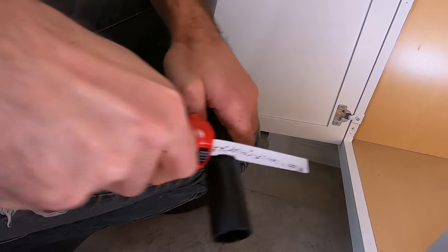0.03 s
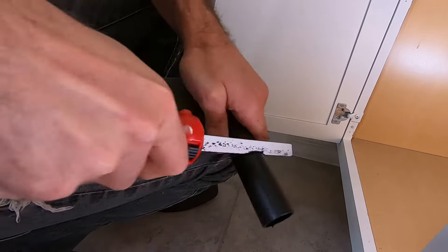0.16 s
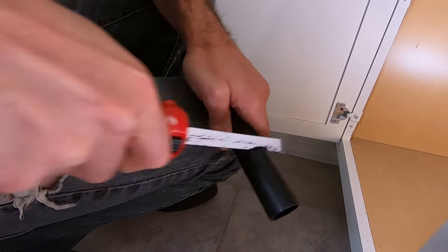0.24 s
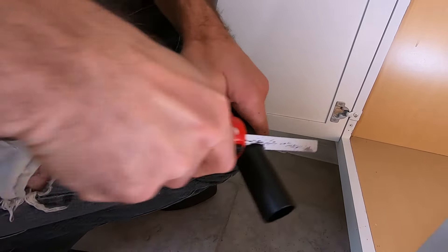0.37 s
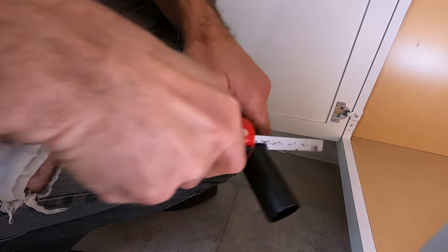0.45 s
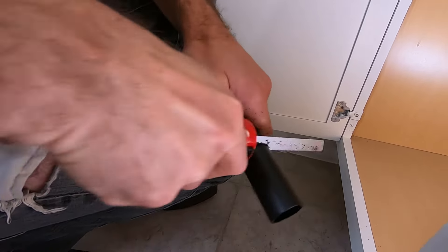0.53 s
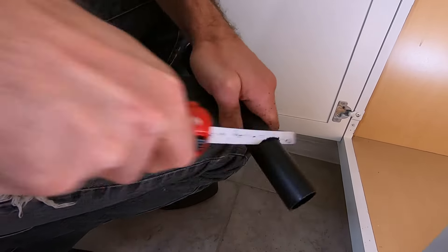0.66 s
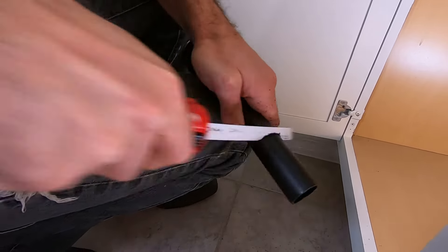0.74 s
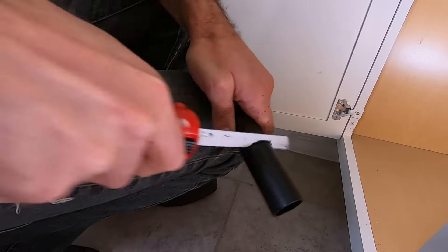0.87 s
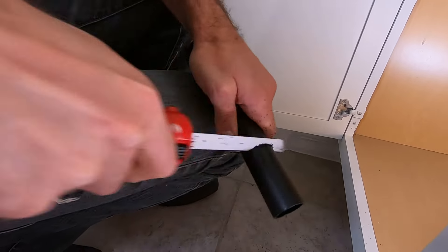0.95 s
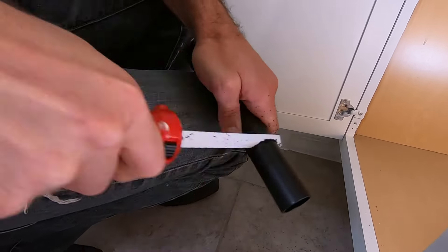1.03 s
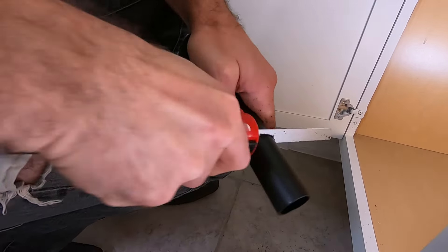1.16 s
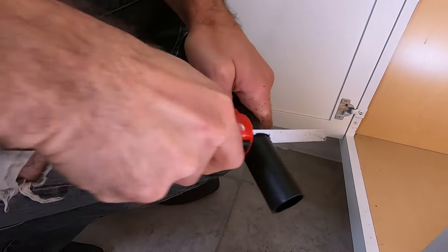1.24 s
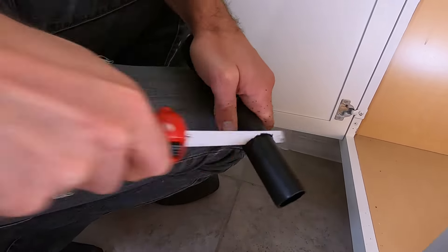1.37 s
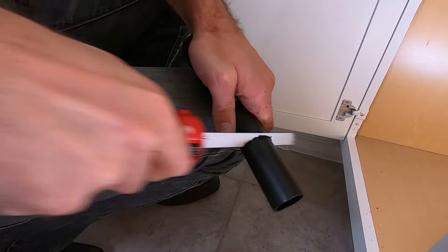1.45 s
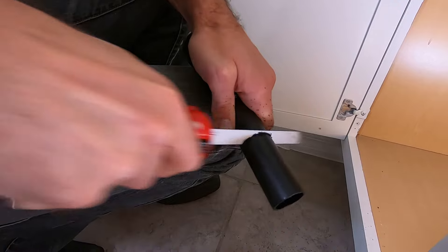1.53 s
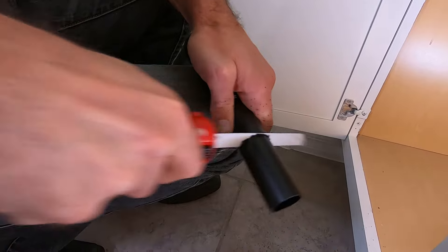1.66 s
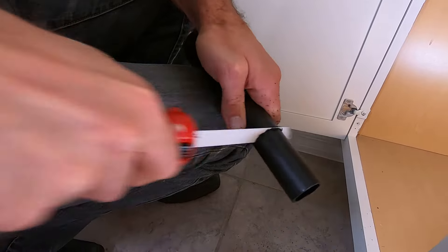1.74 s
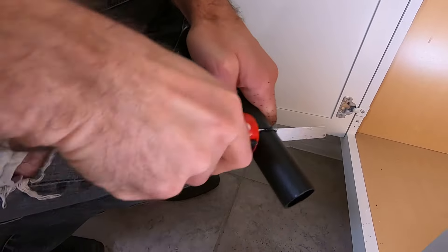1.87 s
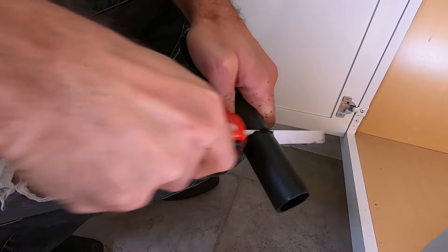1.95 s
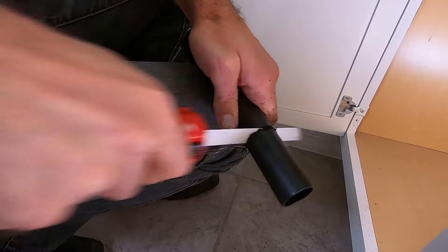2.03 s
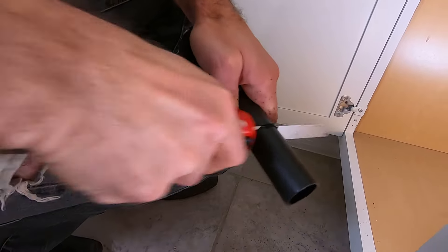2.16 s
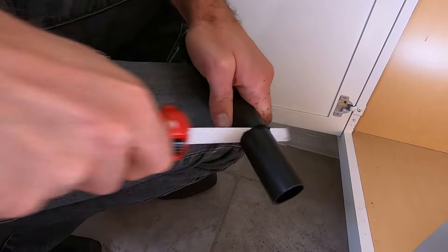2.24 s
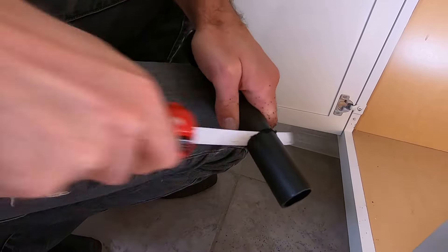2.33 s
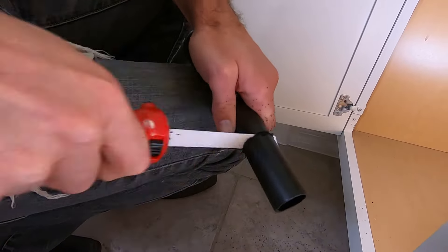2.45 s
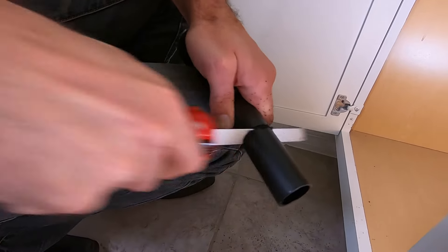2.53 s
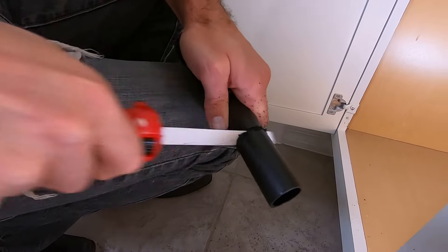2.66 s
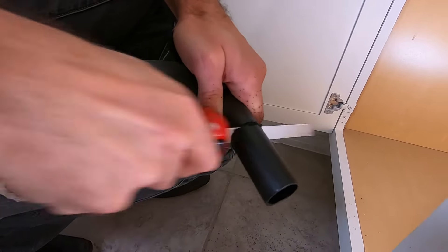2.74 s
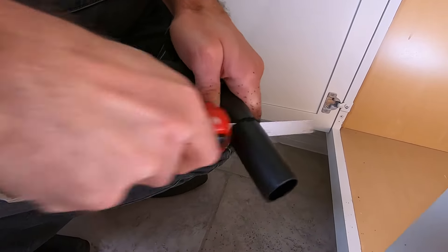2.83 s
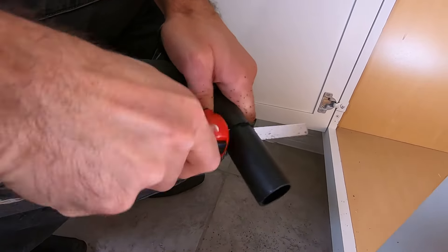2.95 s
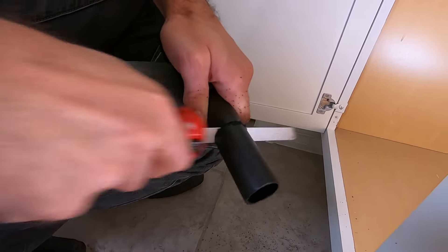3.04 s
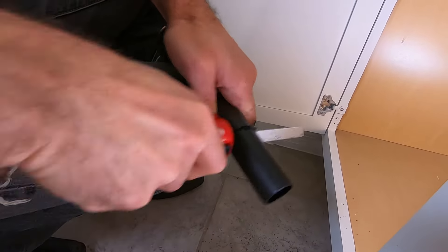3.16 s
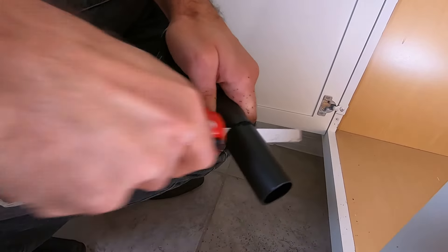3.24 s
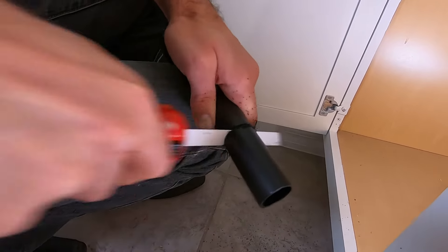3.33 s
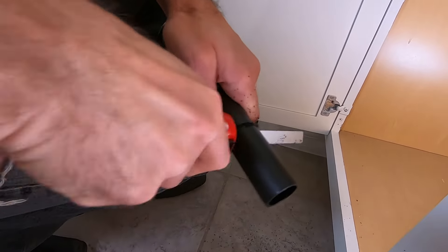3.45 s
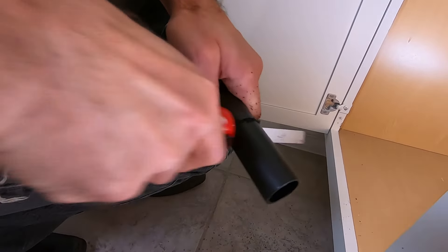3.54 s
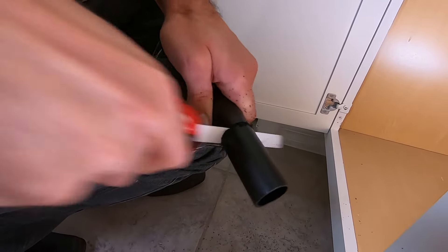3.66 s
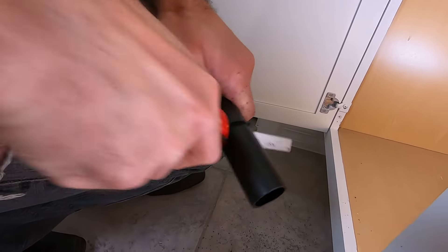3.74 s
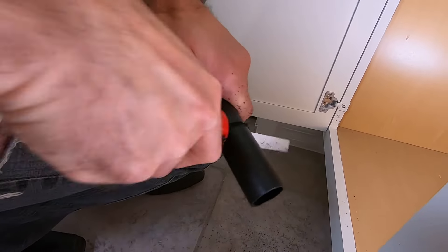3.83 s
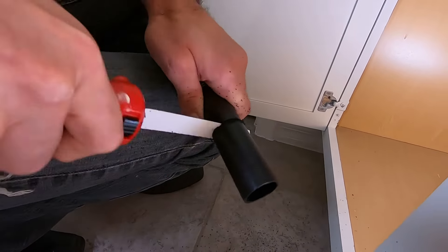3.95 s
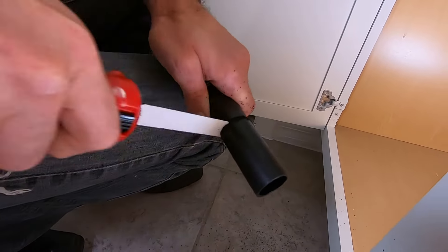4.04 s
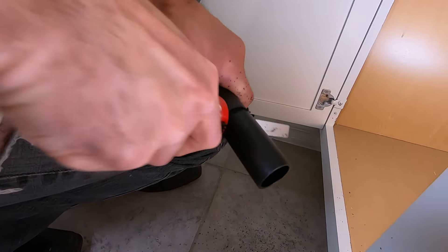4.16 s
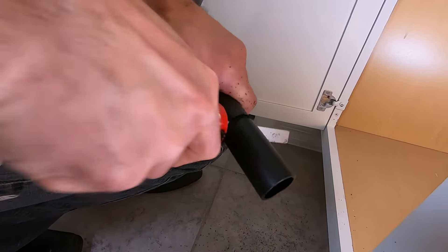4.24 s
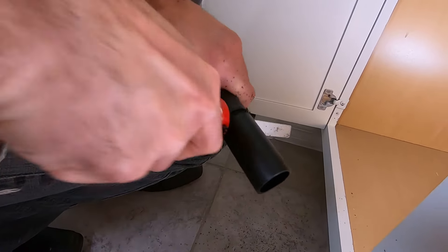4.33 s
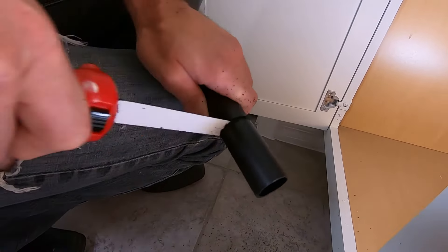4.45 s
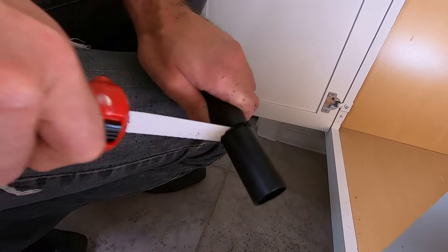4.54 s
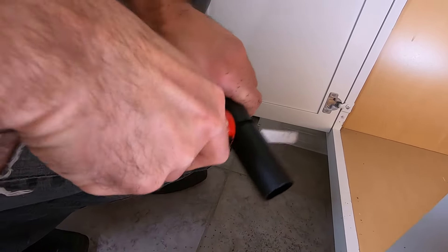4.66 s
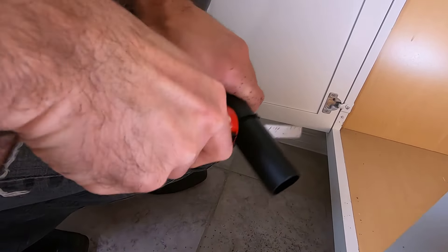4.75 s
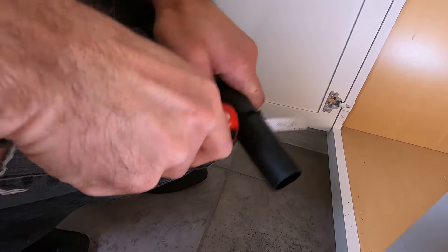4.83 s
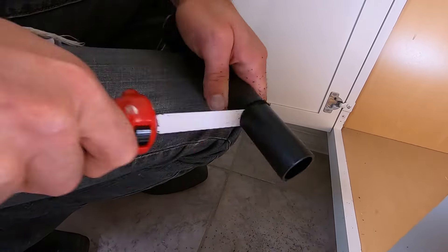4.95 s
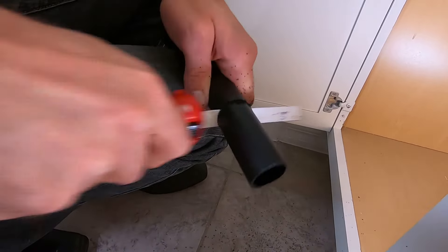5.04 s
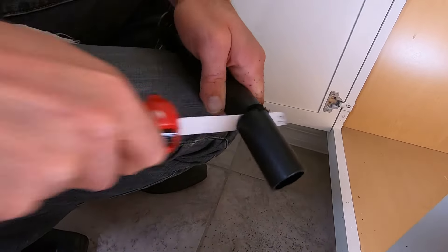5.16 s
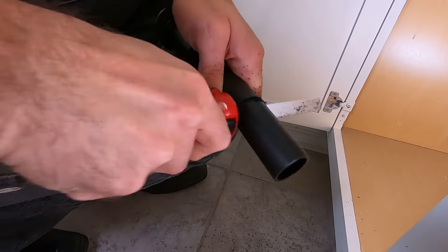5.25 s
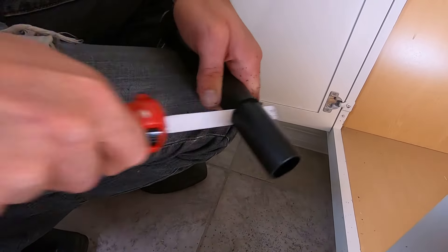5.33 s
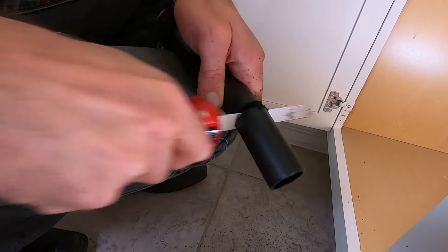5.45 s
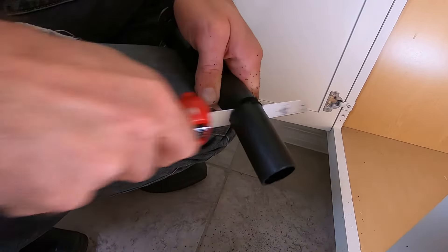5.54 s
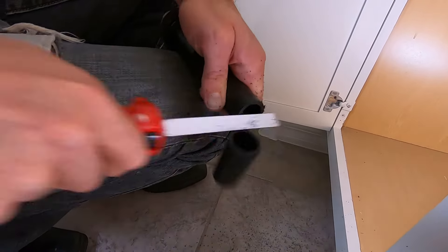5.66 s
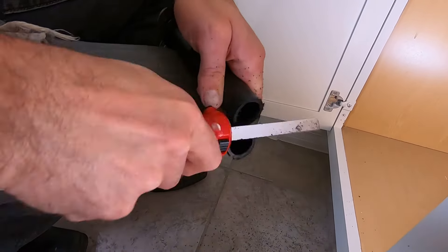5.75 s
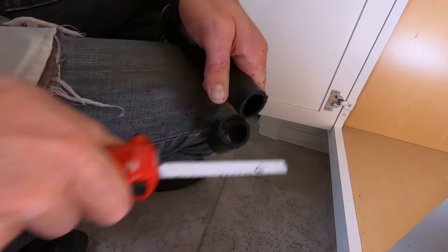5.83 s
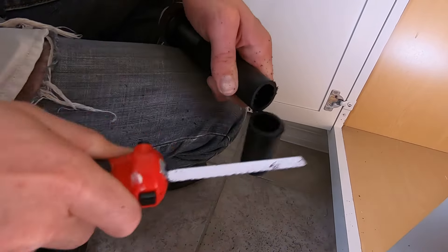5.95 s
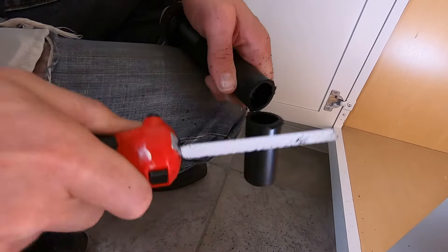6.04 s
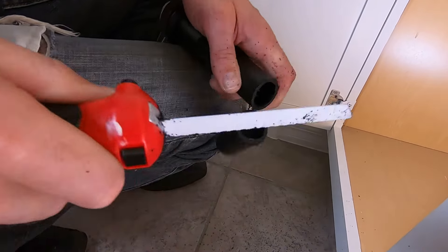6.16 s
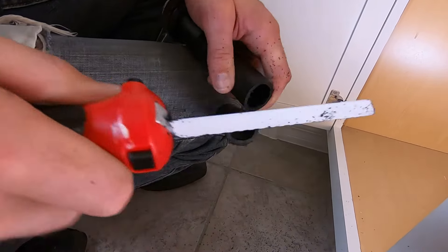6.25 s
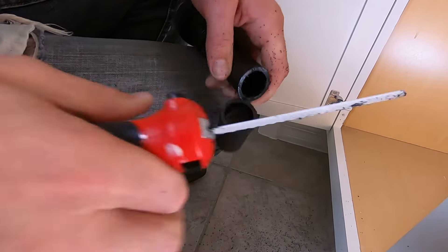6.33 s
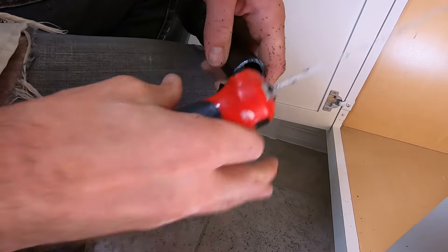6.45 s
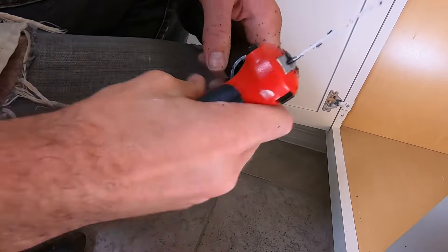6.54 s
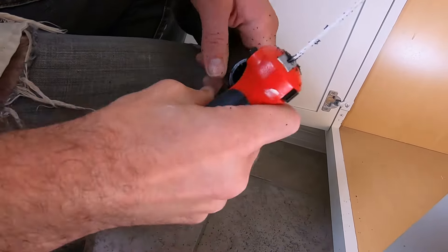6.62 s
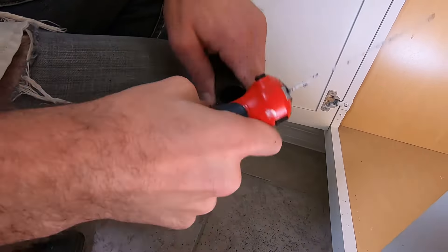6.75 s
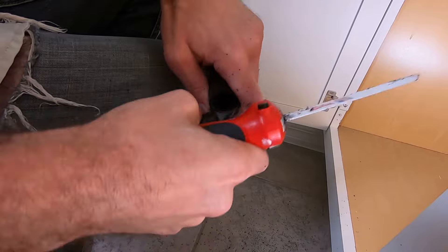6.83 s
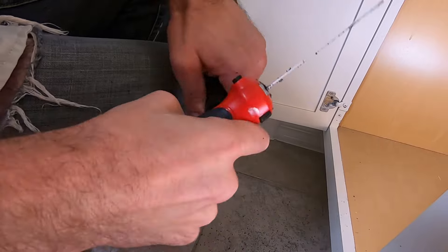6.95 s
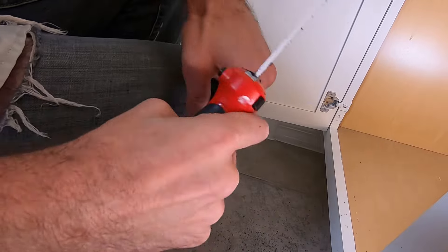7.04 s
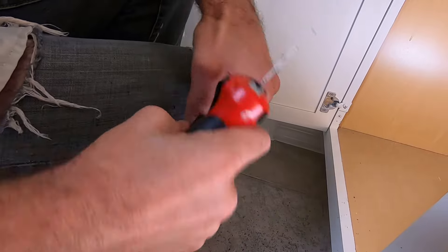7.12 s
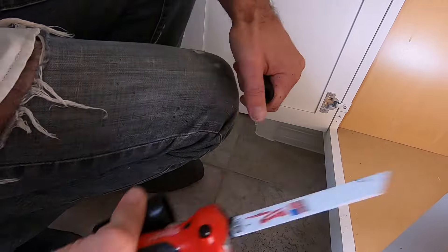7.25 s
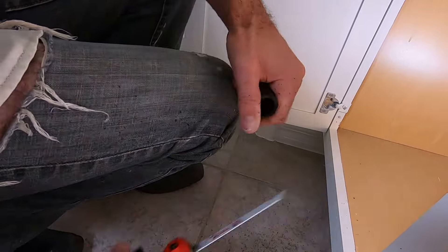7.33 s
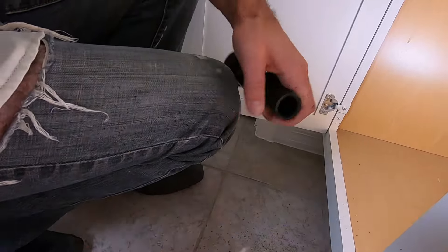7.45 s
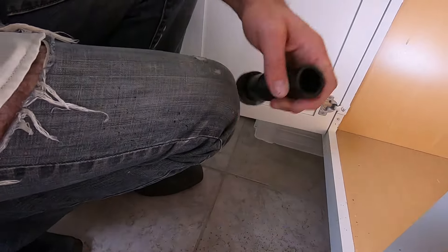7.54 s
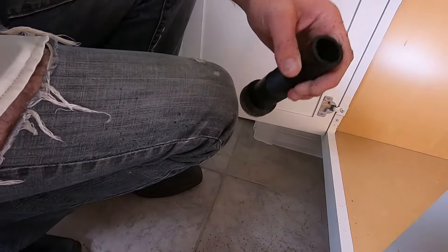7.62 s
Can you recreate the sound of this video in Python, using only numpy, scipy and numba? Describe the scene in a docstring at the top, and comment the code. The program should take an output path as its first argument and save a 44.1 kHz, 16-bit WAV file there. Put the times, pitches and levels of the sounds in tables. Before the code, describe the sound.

A small hand saw rasps through a hollow plastic pipe in very fast strokes, slows, then the offcut snaps off and a light scrape follows.

```python
"""Hand saw through a plastic pipe

A small hand saw goes through a plastic drain pipe in quick short strokes, close by, in a small hard room.
Tooth contacts, timed by the blade speed, rasp directly and drive resonances of the pipe and blade.
Pushes ring the pipe, mostly higher as the cut deepens; pulls skim and hiss. Slow last strokes break through.
Cracks and decaying hollow modes snap off the offcut; filtered noise gives snags, squeals, rubs, taps and bumps.
A short scrape on the cut edge comes last, over the faint noise of still air."""
import sys
import numpy as np
from scipy import signal
from scipy.fft import rfft, irfft, next_fast_len
from scipy.io import wavfile
from scipy.ndimage import uniform_filter1d
from numba import njit

SR = 44100
rng = np.random.default_rng(int(sys.argv[2]) if len(sys.argv) > 2 else 0)


def waveform_to_disk(signal):
    """Save audio, clipped to [-1, 1], as 16-bit WAV at the path in sys.argv[1]."""
    frames = np.transpose(np.atleast_2d(signal))
    scaled = np.clip(frames, -1, 1) * 32767
    samples = np.round(scaled).astype(np.int16)
    wavfile.write(sys.argv[1], SR, samples)


N = 339129
TIME = np.arange(N) / SR
FFT_SIZE = next_fast_len(N + SR)
FREQS = np.maximum(np.fft.rfftfreq(FFT_SIZE, 1 / SR), 1)
# the run of quick strokes lasts between these times (s)
RUN_START_S, RUN_END_S = 0.14, 5.08
# resonances of the pipe wall and blade: (frequency [Hz], width [Hz], lift [dB])
WALL_RESONANCES = [(271, 28, 6), (674, 55, 11), (1176, 68, 3.5), (1307, 43, 2.5), (2450, 41, 3.5),
                   (3670, 2000, 7), (8330, 550, 3.5)]


def from_db(db):
    """Decibels to gain."""
    return 10 ** (np.asarray(db) / 20)


def rms_one(x):
    """Scale to unit rms."""
    return x / np.sqrt(np.mean(x ** 2) + 1e-20)


def evened(x, span_s):
    """Hold the rms near one over every short span."""
    power = uniform_filter1d(x ** 2, max(int(span_s * SR), 8))
    return x / np.sqrt(np.abs(power) + 1e-9)


def in_time(rows):
    """Columns of a curve at every sample."""
    s, *columns = np.transpose(rows)
    return [np.interp(TIME, s, column) for column in columns]


def at_hz(points):
    """A colour table read on a log-frequency axis."""
    hz, value = np.transpose(points)
    return np.interp(np.log(FREQS), np.log(hz), value)


def lift(resonances):
    """Resonances as a dB curve."""
    return sum(db / (1 + (2 * (FREQS - hz) / width_hz) ** 2) for hz, width_hz, db in resonances)


def coloured(x, db):
    """Filter by a dB curve; unit rms."""
    return rms_one(irfft(rfft(x, FFT_SIZE) * from_db(db), FFT_SIZE)[:N])


def noise(spectrum):
    """Noise of a given colour; unit rms."""
    return coloured(rng.standard_normal(N), at_hz(spectrum))


def grains(per_s, spread_db):
    """Random clicks of uneven size; unit rms."""
    sizes = from_db(spread_db * np.minimum(rng.exponential(1, N), 4))
    signs = rng.choice([-1, 1], N)
    return rms_one(sizes * signs * (rng.random(N) < per_s / SR))


def swells(rows):
    """A bell-shaped rise and fall for each row (time [s], level [dB], half length [s])."""
    return sum(from_db(db) * np.exp(-0.5 * np.minimum(((TIME - s) / half) ** 2, 100))
               for s, db, half in rows)


def glides(rows, fall):
    """Level and pitch of short falling tones; log pitch drops by fall in each half length."""
    s, db, hz, half = np.transpose(rows)
    nearest = np.searchsorted((s[1:] + s[:-1]) / 2, TIME)
    lead = np.clip((s[nearest] - TIME) / half[nearest], -2, 2)
    return swells(zip(s, db, half)), hz[nearest] * np.exp(fall * lead)


@njit
def resonate(x, angle, radius):
    """Two-pole resonance whose centre moves."""
    y = np.zeros(len(x))
    for i in range(2, len(x)):
        feedback = 2 * radius * np.cos(angle[i]) * y[i - 1] - radius * radius * y[i - 2]
        y[i] = x[i] - x[i - 2] + feedback
    return y


def ring(x, hz, width_hz):
    """Drive a resonance with steep skirts: a sharp pole pair, then one six times as broad."""
    angle = 2 * np.pi * hz / SR * np.ones(N)
    sharp = resonate(x, angle, np.exp(-np.pi * width_hz / SR))
    return resonate(sharp, angle, np.exp(-np.pi * 6 * width_hz / SR))


def sounding(drive, hz, width_hz):
    """A driven resonance held at a steady level."""
    return evened(ring(drive, hz, width_hz), span_s=0.011)


def saw():
    """Tooth contacts heard directly as a rasp, and through the rings of the pipe."""
    # progress of the cut: (time [s], upper ring [Hz], then levels against the rasp:
    # upper ring [dB], blade hiss [dB], bright chatter [dB])
    cut_progress = [(0.2, 1320, -21.5, -19, -6.5), (1.1, 1780, -17.5, -10, -2), (2.4, 1973, -5, -12, -3),
                    (2.9, 1836, -0.5, -18.5, -15.5), (3.5, 1850, -9, -14.5, -13), (4.9, 1880, -14, -7, -14),
                    (5.19, 1666, -0.5, -8, -15), (5.3, 1680, -2, 2, -18.5), (5.43, 1800, -3, -5, -15.5),
                    (5.55, 1670, -18.5, -1, -20)]
    # main ring of the pipe as the cut opens: (time [s], frequency [Hz])
    main_ring = [(0.9, 635), (1.3, 720), (1.7, 818), (3.4, 870), (5.0, 870), (5.19, 799), (5.3, 872),
                 (5.7, 940)]
    # teeth tearing the plastic: (frequency [Hz], relative level [dB])
    rasp_colour = [(40, -25), (100, -10), (230, -6), (400, -9), (1300, 1), (2100, -0.5), (3000, -7),
                   (5900, -11.5), (7600, -12.5), (8700, -6.5), (12500, -19.5), (15700, -36.5)]
    # steel sliding in the kerf: (frequency [Hz], relative level [dB])
    hiss_colour = [(1500, -30), (3800, -2.5), (9000, 2), (15800, -9)]
    skate_db, skate_end_s = 10.5, 2.0  # in the shallow kerf the pull skates: hiss lift at time 0, and its end
    ring_bend, choke_db = 0.16, 12.5  # ring flat by this share at rest; choked by the end of a stroke
    growl_fall = 1.75  # log of the pitch ratio over the braking

    strokes = all_strokes()
    stroke, speed, spent = blade_motion(strokes)
    _, _, rasp_db, ring_db, growl_db, pull = strokes[stroke].T
    upper_hz, upper_db, hiss_db, chatter_db = in_time(cut_progress)
    # the blade leans differently on every stroke, which shifts colour and pitch a little
    lean = rng.standard_normal((len(strokes), 4))[stroke].T

    knocks, chips = teeth(speed)
    rasp = coloured(chips + 0.21 * knocks, at_hz(rasp_colour) + lift(WALL_RESONANCES))
    upper = rms_one(ring(teeth(speed)[1], upper_hz * np.exp(0.042 * lean[3]), width_hz=80))
    hiss = coloured(teeth(speed)[1], at_hz(hiss_colour) + lift(WALL_RESONANCES))
    # a stroke that skims hisses and hardly rings the pipe; one that digs in is darker
    skim_db = 0.3 * (rasp_db - ring_db)
    skim_db = skim_db + pull * skate_db * np.maximum(1 - TIME / skate_end_s, 0)
    upper_db = upper_db + 0.12 * (ring_db - rasp_db) + pull * 2.5
    tearing = rasp + from_db(upper_db + 1.4 * lean[0]) * upper
    tearing = tearing + from_db(hiss_db + skim_db + 2 * lean[1]) * hiss

    contacts = teeth(speed)[1]
    bright = chatter(stroke, spent, contacts, low_hz=1400, high_hz=4400, width_hz=830)
    dull = chatter(stroke, spent, contacts, low_hz=560, high_hz=1350, width_hz=87)
    tearing = tearing + from_db(chatter_db) * bright + from_db(-7.5) * dull
    # the blade still drags in the kerf as it turns, so neighbouring strokes run into each other
    drag = from_db(-19) * uniform_filter1d(speed, int(0.032 * SR))
    tearing = evened(tearing, span_s=0.014) * from_db(rasp_db - 0.23) * (speed ** 1.43 + drag)

    pitch = in_time(main_ring)[0] * np.exp(0.036 * lean[2])
    body = sounding(chips + knocks, pitch * (1 - ring_bend * (1 - speed)), width_hz=32.4)
    body = body * from_db(ring_db + 1.5 - choke_db * spent)
    # the pull wakes a lower ring, set against its rasp
    pull_ring = sounding(contacts, 652.4 * np.exp(0.03 * lean[0]), width_hz=15)
    body = body + pull_ring * from_db(rasp_db - 9) * pull

    # as the blade brakes, the teeth drag one by one: a rough growl slides down from the ring
    growl = sounding(contacts, pitch * np.exp(-growl_fall * spent), width_hz=320)
    growl = growl * np.sin(np.pi * spent) * from_db(rasp_db + growl_db)
    # the slow last strokes stick and slip: their level wavers
    slipping = from_db(1.5 * noise([(70, -1), (200, -59)]) * (TIME > RUN_END_S))
    return (tearing + body * speed ** 2.17 + growl * speed ** 1.2) * slipping


def all_strokes():
    """The quick run and the single strokes, in order of time; single strokes count as pushes."""
    # strokes that nick the pipe, and slow ones that break through: (time at full blade speed [s],
    # length [s], rasp before trim [dB], pipe ring before trim [dB], growl against the rasp [dB])
    single_strokes = [(0.012, 0.052, -24, -25.5, -5.5), (0.116, 0.034, -33, -46.5, -9.5),
                      (5.091, 0.045, -35.5, -39, -20), (5.182, 0.125, -25.5, -24.5, -10),
                      (5.308, 0.1, -25, -26.5, -18), (5.426, 0.135, -28.5, -30, -22.5),
                      (5.55, 0.085, -22.5, -21.5, -22), (5.666, 0.065, -31.5, -28, 6),
                      (5.71, 0.075, -28.5, -30, -6)]
    rows = np.vstack([quick_strokes(), [(*row, 0) for row in single_strokes]])
    return rows[np.argsort(rows[:, 0])]


def quick_strokes():
    """Pushes and pulls in turn at the arm's pace: rows (s, length s, rasp, ring, growl dB, 1 for a pull)."""
    # pace of the arm: (time [s], push-and-pull cycles per second [Hz])
    arm_pace = [(0.0, 7.465), (0.15, 12.024), (0.45, 12.086), (0.6, 10.39), (1.4, 12.732), (1.6, 12.011),
                (2.2, 14.982), (2.8, 14.887), (3.6, 13.458), (3.8, 12.608), (4.6, 11.68), (5.05, 11.866)]
    # effort, before each stroke's own changes; the pull eases off as the cut deepens:
    # (time [s], push rasp [dB], pull rasp [dB], push pipe ring [dB])
    arm_effort = [(0.16, -18, -27.5, -29), (0.35, -24.5, -23.5, -31), (0.65, -26, -25, -24.5),
                  (1.1, -21, -21, -31), (2.4, -21.5, -22.5, -28.5), (3.1, -21, -26, -25.5),
                  (4.0, -25, -29, -24.5), (4.55, -26.5, -31, -24), (5.05, -24.5, -28, -22.5)]
    # strokes that dig in, each applied to the nearest: (time [s], extra pipe ring [dB], extra rasp [dB])
    digging_in = [(0.206, 10, -5), (0.369, 4.5, 2), (0.496, 17, 4.5), (0.537, 10, 5.5), (0.765, -2, 0.5),
                  (0.813, 4.5, 1.5), (0.946, 12, 1.5), (1.075, 7.5, -0.5), (1.245, 6.5, 0.5),
                  (1.445, 8.5, 1), (1.644, 7.5, -1.5), (2.23, 3.5, 1.5), (2.27, -6, 2.5), (2.36, 2.5, 0),
                  (2.395, 15.5, 1.5), (2.53, 7, 0), (3.145, 8.5, 3.5), (3.178, -2, 2.5), (3.395, 6.5, -1),
                  (3.539, 5, 0.5), (3.615, 3.5, 0), (3.845, 2, -0.5), (4.165, 4, 2.5), (4.25, 2, -1.5),
                  (4.334, 6, 0), (4.417, 5, 1.5), (4.545, 10.5, 2), (4.676, 7.5, 1), (4.842, 2.5, 2.5),
                  (4.928, 6, 0.5)]
    push_s = 0.012  # a push is at full speed here
    push_share = 0.53  # of each cycle

    pace, = in_time(arm_pace)
    cycles = np.cumsum(pace) / SR
    cycles -= np.interp(push_s, TIME, cycles)
    first, last = np.interp([RUN_START_S, RUN_END_S], TIME, 2 * cycles)
    number = np.arange(np.ceil(first), last)
    s = np.interp(number / 2, cycles, TIME)
    push = number % 2 == 0
    length = np.where(push, push_share, 1 - push_share) / np.interp(s, TIME, pace)

    push_db, pull_db, ring_db = (np.interp(s, TIME, column) for column in in_time(arm_effort))
    extra_ring_db, extra_rasp_db = np.zeros((2, len(s)))
    for at, more_ring_db, more_rasp_db in digging_in:
        nearest = np.argmin(np.abs(s - at))
        extra_ring_db[nearest] += more_ring_db
        extra_rasp_db[nearest] += more_rasp_db
    # no two strokes are alike: each level has its own random spread in dB
    chance = rng.standard_normal((3, len(s)))
    rasp_db = np.where(push, push_db, pull_db) + extra_rasp_db + 0.8 * chance[0]
    ring_db = ring_db - 16 * ~push + extra_ring_db + 1.2 * chance[1]  # a pull rings the pipe 16 dB less
    growl_db = np.where(push, -6, -17) + 2.5 * chance[2]
    return np.column_stack([s, length, rasp_db, ring_db, growl_db, ~push])


def blade_motion(strokes, turn_s=0.009, rush=0.92, arch_s=0.11):
    """Stroke under way, blade speed (near 0 at a turn, near 1 mid-stroke) and braking done (0-1).

    The blade gains speed faster than it loses it; strokes longer than arch_s hold their speed."""
    s, length = strokes[:, 0], strokes[:, 1]
    start = s - length * 0.5 ** (1 / rush)
    stroke = np.maximum(np.searchsorted(start, TIME) - 1, 0)
    travel = np.clip((TIME - start[stroke]) / length[stroke], 0, 1) ** rush
    arch = np.abs(np.sin(np.pi * travel)) ** np.minimum(arch_s / length, 1)[stroke]
    speed = np.abs(uniform_filter1d(arch, max(int(turn_s * SR), 1)))
    return stroke, speed, np.maximum(2 * travel - 1, 0)


def teeth(speed, top_hz=930, uneven_db=0.26, chip_sharpness=1.5):
    """Each tooth knocks and then tears a chip; teeth pass at an uneven rate that follows the speed."""
    passed = np.cumsum(top_hz * speed * rng.exponential(1, N) / SR)
    tooth = passed.astype(int)
    bite = from_db(uneven_db * np.clip(rng.standard_normal(N), -2, 2))[tooth]
    knocks = bite * (np.diff(tooth, prepend=0) > 0)
    chips = bite * np.exp(-chip_sharpness * (passed % 1)) * rng.standard_normal(N)
    return rms_one(knocks), rms_one(chips)


def chatter(stroke, spent, contacts, low_hz, high_hz, width_hz, sag=0.096):
    """A resonance of the blade, at a new pitch on every stroke, that sags as it brakes."""
    hz = low_hz * (high_hz / low_hz) ** rng.random(stroke.max() + 1)
    return evened(ring(contacts, hz[stroke] * np.exp(-sag * spent), width_hz), span_s=0.043)


def snags():
    """The blade snags and shakes the pipe: rough shudders of resonant noise, falling in pitch."""
    # (time [s], level [dB], frequency [Hz], half length [s])
    shudders = [(0.114, -31.5, 308, 0.0061), (0.369, -19.5, 550, 0.005), (0.54, -27.5, 496, 0.01),
                (0.727, -22.5, 523, 0.0074), (3.55, -26.5, 425, 0.0046), (4.015, -24, 328, 0.0029),
                (5.452, -31.5, 604, .017), (5.694, -28.5, 260, 0.0061), (5.703, -30, 615, 0.0058)]
    level, pitch = glides(shudders, fall=0.19)
    return level * sounding(rng.standard_normal(N), pitch, width_hz=150)


def squeals(treble_hz=4000):
    """The grabbing blade sings in one noise-driven resonance: narrow when low, hoarse when high."""
    # (time [s], level [dB], frequency [Hz], half length [s])
    grabs = [(0.28, -24, 2040, 0.0022), (0.367, -23, 4870, 0.0022), (0.407, -27.5, 8450, 0.0039),
             (0.487, -24, 8840, 0.0037), (0.765, -24, 2730, 0.0089), (1.075, -24, 1330, 0.0061),
             (2.837, -19, 1870, 0.0073), (2.968, -26, 1980, 0.0045), (3.037, -22, 876, 0.0033),
             (5.176, -23.5, 1636, 0.0075), (5.524, -19.5, 894, 0.0047), (5.662, -32.5, 2430, 0.0055),
             (5.728, -25, 940, .007)]
    level, pitch = glides(grabs, fall=0.023)
    friction = rng.standard_normal(N)
    narrow = ring(friction, pitch, width_hz=70)
    hoarse = ring(friction, pitch, width_hz=600)
    return level * evened(np.where(pitch < treble_hz, narrow, hoarse), span_s=0.013)


def snap(snap_s=6.539, rise_s=0.0028):
    """The last sliver gives way in a dense run of cracks and leaves the offcut ringing."""
    # colour of the cracks and their tail: (frequency [Hz], relative level [dB])
    crack_colour = [(100, -26), (270, -8), (470, -19), (630, -3.5), (1050, -4.5), (1400, -13), (2900, -8.5),
                    (3900, -14.5), (5200, -32), (10300, -38), (15000, -60)]
    # hollow modes of the loose offcut: (frequency [Hz], level against offcut_db [dB], t60 [s])
    offcut_modes = [(657, -17, 0.47), (775, -6, 0.18), (1244, -8, 0.25), (1330, -6, 0.23), (1900, -6, 0.18),
                    (2400, -7, 0.19), (2987, 1, 0.2), (3305, -14, 0.28), (3900, -11, 0.19)]
    snap_db, tail_db, offcut_db = -29, -13.5, -40  # the tail is set against the snap
    age = TIME - snap_s
    rise = np.exp(np.clip(age / rise_s, -50, 0))

    def fade(t60):
        """Quick rise, then a fall of 60 dB in t60 seconds."""
        return rise * from_db(-60 * np.clip(age / t60, 0, 3))

    cracks = evened(coloured(grains(2500, spread_db=2.0), at_hz(crack_colour)), span_s=0.0085)
    tail = from_db(tail_db) * fade(0.25) * noise(crack_colour)
    hollow = sum(from_db(offcut_db + db) * fade(t60) * np.sin(2 * np.pi * (hz * age + rng.random()))
                 for hz, db, t60 in offcut_modes)
    return from_db(snap_db) * (fade(0.099) * cracks + tail) + hollow


def handling():
    """Friction grains rub and scrape, noise bursts tap, and noise through a low resonance bumps."""
    # fingers and blade slide over the pipe: (time [s], level [dB], half length [s])
    slides = [(5.135, -35, 0.011), (5.274, -30, 0.0068), (5.383, -44, 0.02), (5.5, -41, 0.016),
              (5.615, -43, 0.045), (5.84, -57, 0.027), (6.26, -61.5, 0.029), (6.44, -64, 0.014),
              (6.82, -72, 0.051), (7.13, -56, 0.02), (7.515, -62, 0.008)]
    # colour of a slide: (frequency [Hz], relative level [dB])
    slide_colour = [(300, -6.5), (1000, 0.5), (3500, -10.5), (9000, -5.5), (15000, -30)]
    # the blade bites the cut edge: (time [s], level [dB], half length [s])
    edge_bites = [(7.686, -30, 0.0093)]
    # colour of the edge: (frequency [Hz], relative level [dB])
    edge_colour = [(500, -38.5), (2200, -7), (8000, -9), (15800, -21)]
    # small taps of plastic: (time [s], nominal peak level [dB])
    tap_times = [(6.073, -49), (6.329, -53), (6.647, -48), (7.2, -33)]
    # colour of a tap: (frequency [Hz], relative level [dB])
    tap_colour = [(300, -8), (3500, -4), (5500, -17.5), (9000, -2), (15000, -36)]
    # ringing click of a tap: (frequency [Hz], width [Hz])
    tap_click = (3500, 480)
    # dull knocks of pipe, hand and knee: (time [s], level [dB], frequency [Hz], half length [s])
    dull_knocks = [(6.01, -60, 168, 0.022), (7.2, -42, 104, 0.017)]

    def fades(t60):
        """Level of the taps, each falling 60 dB in t60 seconds; 12.5 dB turns peak into rms."""
        return sum(from_db(db - 12.5 - 60 * np.clip((TIME - s) / t60, 0, 2)) * (TIME >= s)
                   for s, db in tap_times)

    friction = grains(6000, spread_db=4.0)
    # light rubs catch and slip
    catching = rms_one(from_db(2.5 * noise([(50, 3.0), (200, -42.5)])))
    rubs = swells(slides) * catching * coloured(friction, at_hz(slide_colour) + lift(WALL_RESONANCES))
    edge = swells(edge_bites) * coloured(friction, at_hz(edge_colour))
    clicks = fades(0.082) * sounding(rng.standard_normal(N), *tap_click)
    taps = fades(0.059) * noise(tap_colour) + clicks
    bump_level, bump_hz = glides(dull_knocks, fall=0)
    bumps = bump_level * sounding(rng.standard_normal(N), bump_hz, width_hz=29)
    return rubs + edge + taps + bumps


def room(x, early_db=-13.0, early_t60_s=0.056, late_db=-14.0, late_t60_s=0.36, wall_hz=7000):
    """Quick dense echoes off knee and cabinet and a longer, duller tail: two decaying noises."""
    t = np.arange(1, SR // 2) / SR
    early, late = rng.standard_normal((2, len(t)))
    early = early * np.exp(-np.log(1000) * t / early_t60_s)
    late = signal.sosfilt(signal.butter(1, wall_hz, fs=SR, output="sos"), late)
    late = late * np.exp(-np.log(1000) * t / late_t60_s)
    response = from_db(early_db) * early / np.linalg.norm(early)
    response = response + from_db(late_db) * late / np.linalg.norm(late)
    return signal.fftconvolve(x, response)[:N]


def air(level_db=-67):
    """Still air of the room: steady coloured noise."""
    # (frequency [Hz], relative level [dB])
    air_colour = [(45, -8.5), (130, -1.5), (600, -16), (3500, -23.5), (9000, -27.5), (15000, -49.5)]
    return from_db(level_db) * noise(air_colour)


def width(mid, lag_s=0.003):
    """Until the quick run ends, delayed low-middle and treble bands differ between left and right."""
    delayed = np.roll(mid, int(lag_s * SR))
    side = np.zeros(N)
    for band_hz, db in [((460, 580), -10.5), ((6000, 12000), -13.5)]:
        band = signal.butter(2, band_hz, "band", fs=SR, output="sos")
        side += from_db(db) * signal.sosfiltfilt(band, delayed)
    return side * np.interp(TIME, [5.06, 5.1], [1, 0])


def scene():
    """All sources and their room in the middle, plus a side signal of opposite sign left and right."""
    direct = saw() + snags() + squeals() + snap() + handling()
    mid = direct + room(direct) + air()
    side = width(mid)
    return np.array([mid + side, mid - side])


def record(dry):
    """The microphone sheds the deep bass; a steep filter cuts the top."""
    thin = signal.sosfilt(signal.butter(3, 70, "high", fs=SR, output="sos"), dry)
    return signal.sosfilt(signal.ellip(16, 0.1, 90, 15750, fs=SR, output="sos"), thin)


dry = scene()
out = record(dry)
waveform_to_disk(out)
```